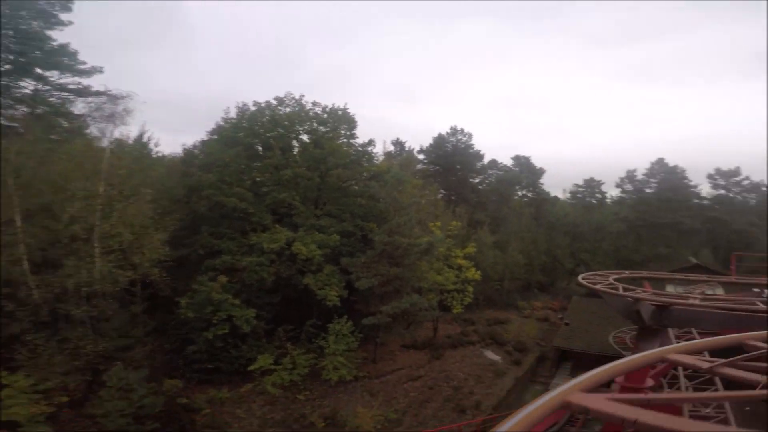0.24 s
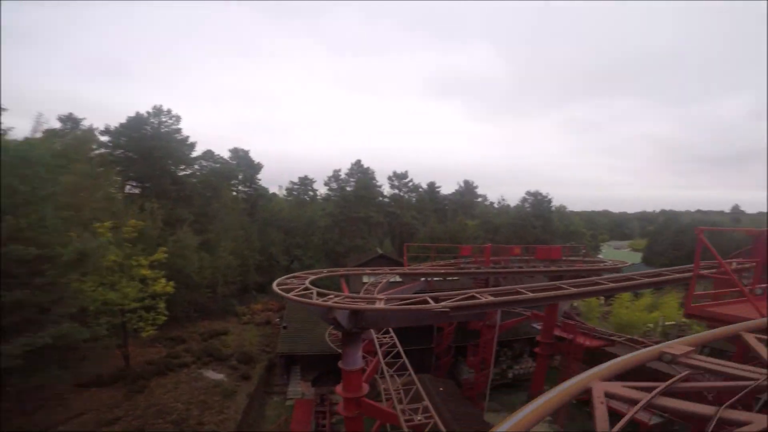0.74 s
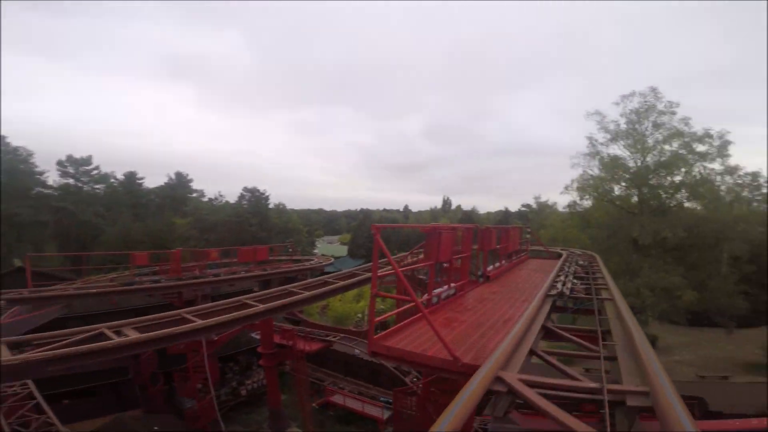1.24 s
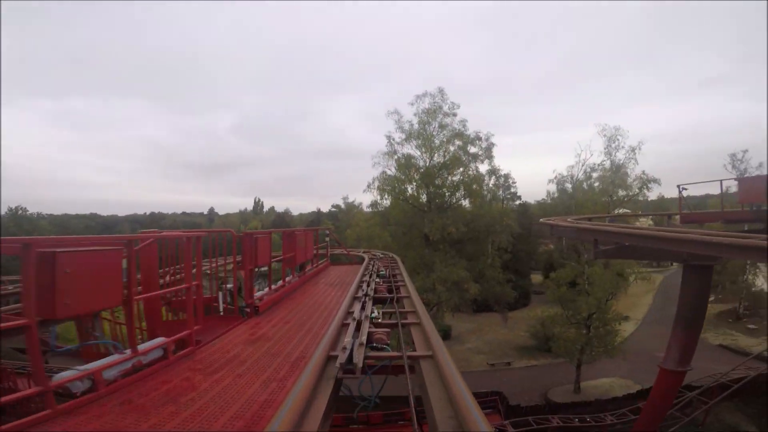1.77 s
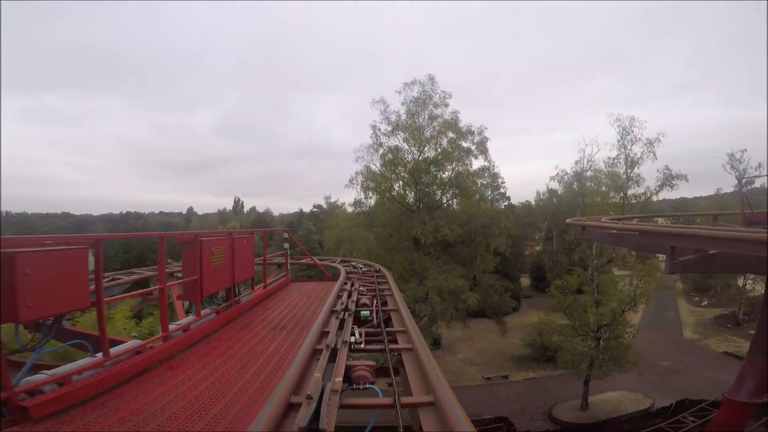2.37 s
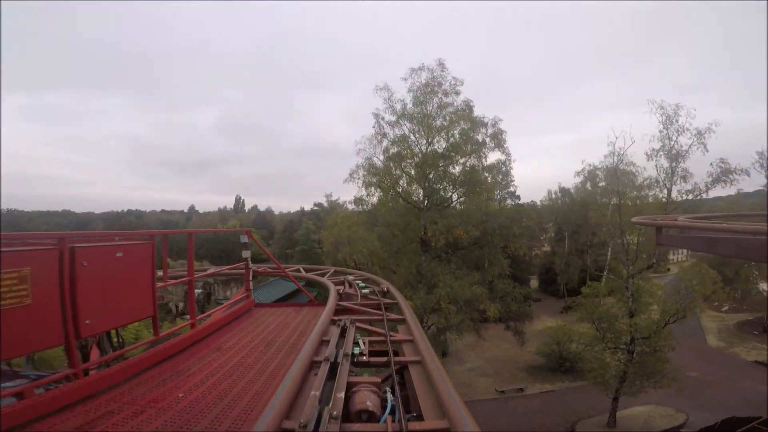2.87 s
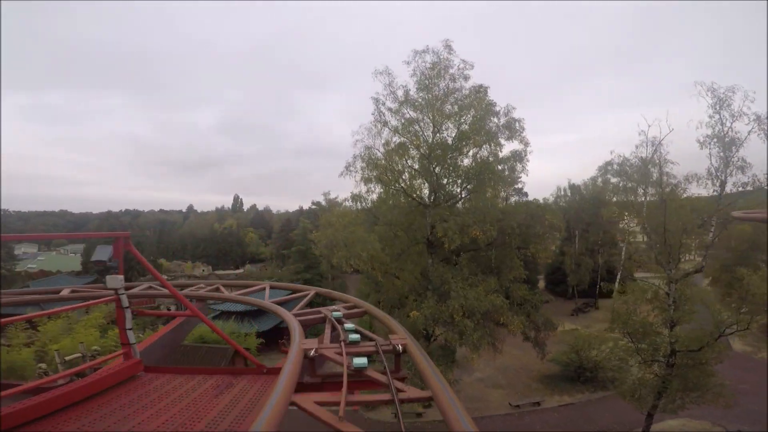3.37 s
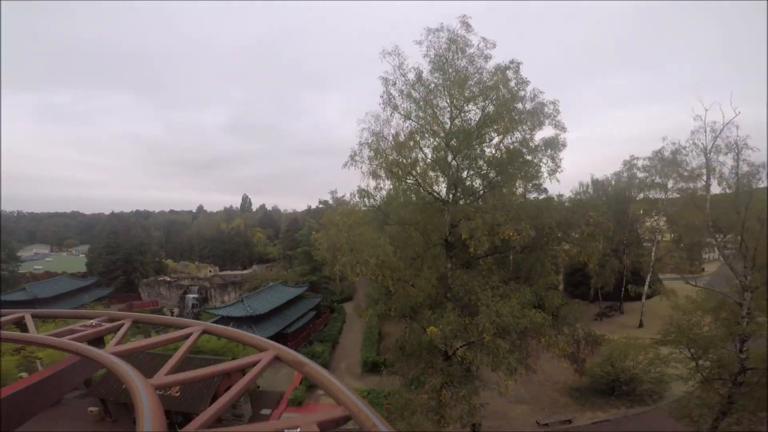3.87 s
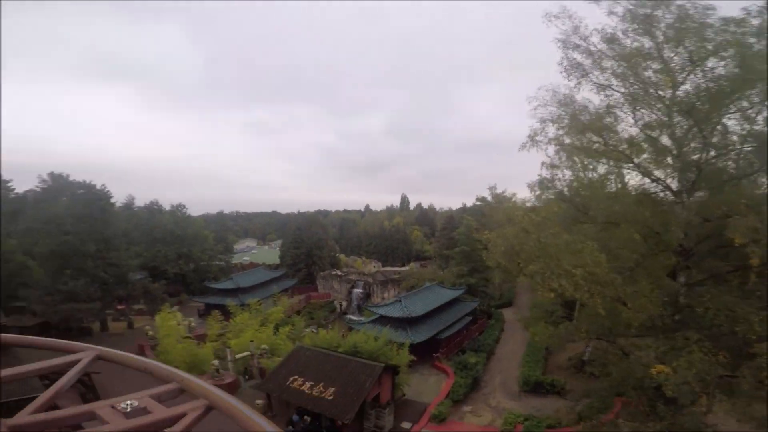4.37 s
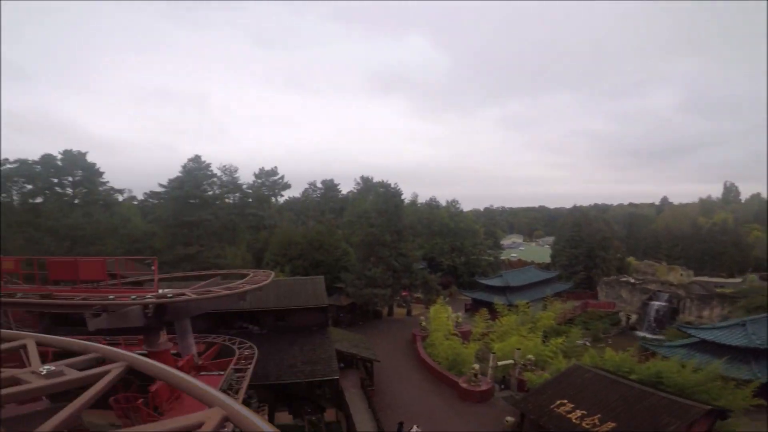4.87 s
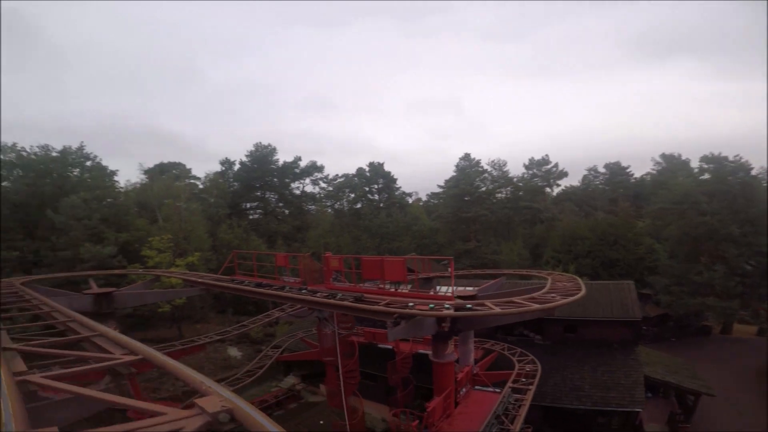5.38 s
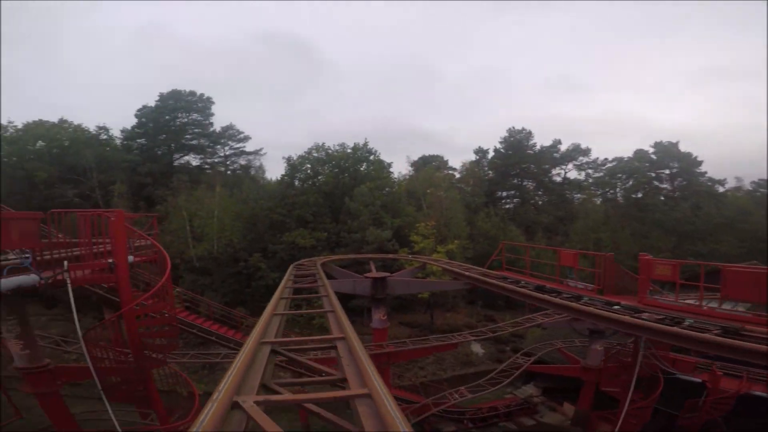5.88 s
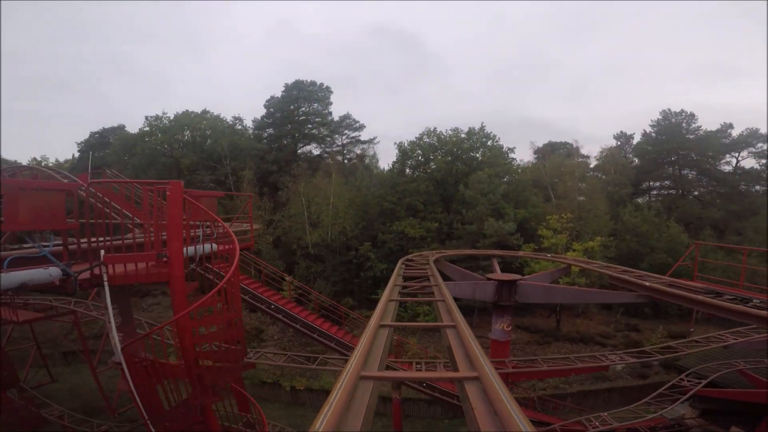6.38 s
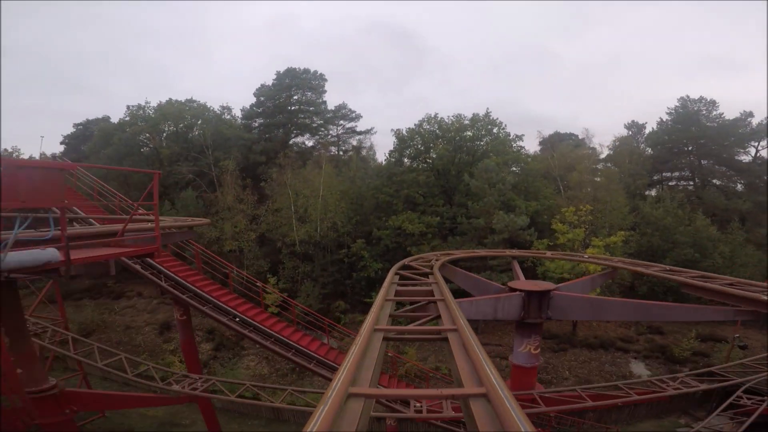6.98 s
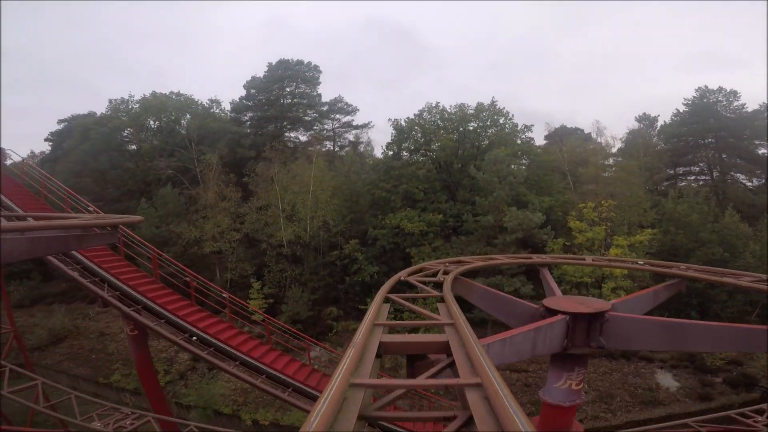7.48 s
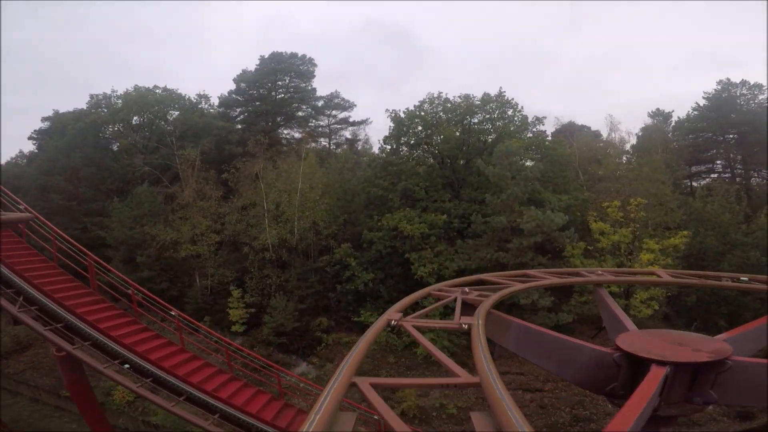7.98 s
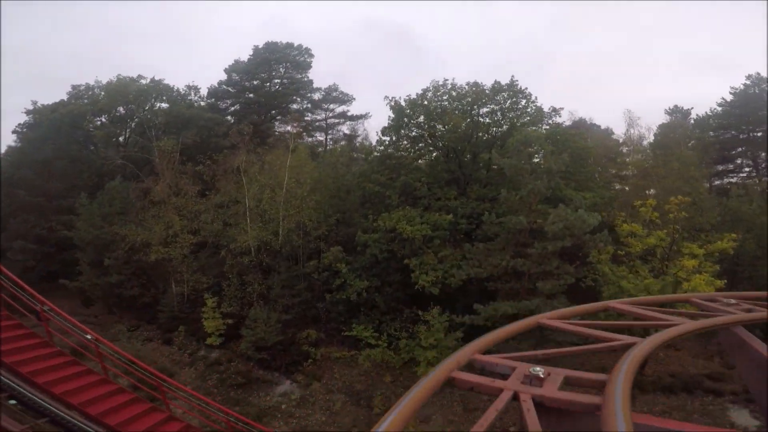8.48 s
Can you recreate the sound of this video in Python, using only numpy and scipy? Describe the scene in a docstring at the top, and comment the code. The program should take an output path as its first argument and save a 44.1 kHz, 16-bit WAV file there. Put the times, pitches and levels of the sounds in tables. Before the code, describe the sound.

Heavy low coaster rumble felt through the car, with dull knocks, a cluster of creaky metal groans, and a brief piercing wheel squeal at the end.

```python
"""Steel roller coaster, on board

Two bends and a level brake section, heard at no distance by a camera's two microphone ports, fixed to the car.
Shaken resonances make the heave, boom and drone; shaped noise makes the roar, hiss, grinding and scrapes.
Short damped rings and noise bursts make the coupling knocks, and noise bursts the judders.
Gliding sines make the wheel hum, frame groans and squeals, with one strong squeal in the last bend.
"""
import sys
import numpy as np
from scipy import signal
from scipy.fft import rfft, irfft, next_fast_len
from scipy.io import wavfile
from scipy.ndimage import uniform_filter1d, minimum_filter1d

SR = 44100
rng = np.random.default_rng(int(sys.argv[2]) if len(sys.argv) > 2 else 0)


def master_out(mix):
    """Clip the mix to full scale and print it as 16-bit PCM to the path in sys.argv[1]."""
    frames = np.transpose(np.atleast_2d(mix))
    ceiling = np.clip(frames, -1, 1)
    pcm = np.round(ceiling * 32767).astype(np.int16)
    wavfile.write(sys.argv[1], SR, pcm)


N = 384993
T = np.arange(N) / SR  # seconds
FREQ = np.maximum(np.arange(N // 2 + 1) * SR / N, 1)  # Hz

# How the mount passes vibration to the left port against the right.
# Each row: frequency in Hz, left level in dB, left lead in radians.
MOUNT = [(38.4, -17, 4.5), (96, -12, -1), (179, -23.5, 1), (324, -13, 3.5), (513, -5.5, 4), (690, -4, 3.5),
         (1170, -3, 3.5), (2320, -0.5, 0.76), (3840, -1.5, 1), (7440, -2.5, -2.5), (10800, -10.5, -1.5)]

# Resonances of the car: its heave on the wheels, its chassis, the upper chassis mode and its frame.
# Each row: frequency in Hz, width in Hz, relative level in dB.
HEAVE_MODES = [(27.8, 35, -10.5), (39.3, 27, 6), (79.65, 9.6, 1)]
CHASSIS_MODES = [(123.3, 52, -0.083), (147.2, 48, -0.074)]
UPPER_MODE = [(178.14, 28, 0)]
FRAME_MODES = [(232, 34, -1.5), (269.6, 45.3, 1), (364, 20, -15.5)]
# Course of the ride's rumble. Each row: time in seconds, heave, chassis boom and frame drone in dB before trims.
RIDE = [(0, -18.5, -15.5, -41), (.55, -22.5, -20.5, -40.5), (1.05, -26.5, -17, -36.5),
        (1.8, -21.5, -20, -38), (2.4, -27, -25.5, -40), (3.6, -24.5, -22.5, -28), (4.25, -23, -19.5, -32.5),
        (4.7, -20, -26, -36.5), (5.9, -20.5, -19.5, -30), (6.8, -24, -23, -41), (7.8, -22, -19, -33.5),
        (8.73, -18.5, -21, -33.5)]
# Separate swells of the upper chassis mode. Each row: time in seconds, level in dB before trim.
UPPER_BOOM = [(0.0, -29.5), (0.51, -37), (0.82, -23), (1.55, -36), (2.82, -33.5), (3.62, -30.5),
              (5.76, -28.5), (5.98, -25), (6.25, -38.5), (8.41, -31), (8.44, -36.5)]

# Hum of the wheels on the rails. Each row: time in seconds, centre pitch in Hz, mean level in dB.
WHEEL_HUM = [(0, 118.5, -41), (1.5, 117.9, -29.5), (2.55, 122, -27.5), (2.75, 124.2, -21.5),
             (2.92, 121.6, -29), (3.12, 122.1, -20), (3.27, 122, -24.5), (3.88, 119, -22),
             (4.13, 123.4, -19.5), (4.25, 125.8, -29.5), (6.1, 122.6, -31), (6.6, 129.3, -24.5),
             (8.3, 140.6, -26.5), (8.73, 120.3, -20)]

# Spectra of the rolling wheels, low roar and fine hiss. Each row: frequency in Hz, relative density in dB per Hz.
ROAR_SPECTRUM = [(150, -12), (300, 12), (450, 2), (650, -5.5), (1000, -13), (1500, -19), (2200, -30.5),
                 (4000, -30.5), (9000, -52.5)]
HISS_SPECTRUM = [(500, -8.5), (1100, 1.5), (1900, -3.5), (2650, -0.5), (3400, -10), (4700, -11.5),
                 (6000, -4), (7300, 3), (8400, -3.5), (10000, -9.5), (11500, -23.5), (15000, -55.5)]
# Course of the rolling noise. Each row: time in seconds, roar and hiss in dB before trims.
ROLL = [(0, -59, -65.5), (.3, -64, -76), (1.2, -62.5, -75), (1.6, -61.5, -73.5), (2.45, -61.5, -70.5),
        (2.9, -60.5, -69.5), (3.7, -55.5, -69.5), (4.15, -58, -77), (4.6, -65.5, -78), (5.3, -61, -71.5),
        (5.9, -60, -75.5), (6.7, -61, -76.5), (7.3, -55.5, -66), (8.25, -53.5, -61.5), (8.73, -58, -69)]

# Side wheels grinding before the last bend. Each row: time in seconds, level in dB.
GRIND = [(6.1, -101), (6.4, -59.5), (7.0, -57), (7.5, -77), (8, -97)]
# Resonance of the grinding. Each row: frequency in Hz, width in Hz, relative level in dB.
GRIND_MODE = [(970, 610, 0)]

# Faint wheel squeals. Each row: start in seconds, length in seconds, centre pitch in Hz, level in dB.
SQUEALS = [(0.774, 0.23, 2590, -71), (2.1, 2.0, 3870, -71), (4.243, 0.027, 3920, -62),
           (4.76, 0.46, 3190, -75), (5.19, 0.13, 2990, -66.5), (6.014, 0.04, 3770, -61)]

# Dry scrapes of a side wheel. Each row: peak time in seconds, level in dB.
SCRAPES = [(4.149, -45.5), (6.009, -53)]
# Resonance of the scrapes. Each row: frequency in Hz, width in Hz, relative level in dB.
SCRAPE_MODE = [(1650, 1160, 0)]

# Frame groans in the brake section. Each row: start in seconds, length in seconds, centre pitch in Hz, level in dB.
GROANS = [(2.648, 0.12, 227.2, -15.5), (2.729, 0.072, 270, -20.5), (2.855, 0.073, 290.4, -23),
          (2.965, .055, 355, -25), (3.01, 0.072, 282, -18.5), (3.252, 0.15, 227.6, -21),
          (3.403, 0.097, 229.3, -19.5), (3.413, .055, 358, -22.5), (3.443, 0.065, 273.6, -24.5),
          (3.534, 0.082, 226, -17.5), (3.583, 0.082, 258.4, -15), (3.669, 0.084, 348.6, -22.5),
          (3.707, 0.084, 276.5, -22), (3.795, 0.068, 310.7, -22), (3.836, .14, 223.6, -21)]

# Judders as wheels and brake fin scrub. Each row: peak time in seconds, scrub in dB before trims, crackle in dB.
JUDDERS = [(1.665, -36, -73), (1.704, -30, -53), (2.661, -33, -75.5), (2.705, -25, -51),
           (2.831, -20, -49.5), (2.993, -23.5, -57.5), (3.1, -32, -77), (3.436, -27.5, -58),
           (3.592, -20.5, -46), (3.702, -31, -71), (3.825, -28.5, -59), (4.051, -34.5, -68),
           (6.008, -31, -50.5), (6.044, -38, -61), (6.165, -29.5, -60)]
# Spectrum of scrubbing and scuffing. Each row: frequency in Hz, relative density in dB per Hz.
SCRUB_SPECTRUM = [(120, -16), (240, 3), (360, 8), (425, -1), (500, 3), (565, 1), (635, -2), (950, -8),
                  (1400, -21), (2700, -36), (5000, -51.5), (8500, -42.5), (12000, -75)]
# Loose panels that clatter in a judder. Each row: frequency in Hz, width in Hz, relative level in dB.
CLATTER_MODES = [(365, 48, 1.5), (474, 94, -4), (603, 25, 3), (782, 140, -13)]

# Coupling knocks. Each row: time in seconds, clunk and tick in dB before trims, lower and upper pin in dB.
KNOCKS = [(1.446, -29, -58.5, -54, -47.5), (1.463, -28.5, -58.5, -43, -55),
          (1.483, -28.5, -58.5, -48.5, -57.5), (1.575, -28.5, -61, -60, -52),
          (1.59, -37.5, -57.5, -50, -61), (1.647, -27.5, -60, -54, -50.5), (1.759, -33.5, -70, -63.5, -67),
          (1.789, -29.5, -64, -61.5, -57.5), (1.863, -27, -59.5, -49, -50.5),
          (2.192, -26.5, -60, -45.5, -45.5), (2.276, -28, -71, -56, -60), (3.318, -22, -65, -46.5, -46.5),
          (3.863, -24, -57.5, -43, -49.5), (3.894, -29, -66.5, -55, -58), (3.915, -25, -59.5, -52.5, -49),
          (5.665, -38, -66, -60, -55), (5.701, -30.5, -54.5, -51.5, -55), (5.703, -31.5, -58, -56, -55),
          (5.713, -30, -67, -49.5, -50), (5.778, -26.5, -66, -45.5, -65), (5.831, -34.5, -72, -49.5, -72.5),
          (6.066, -23.5, -51, -42.5, -62), (6.09, -25.5, -59.5, -47.5, -60), (6.152, -25, -56, -57, -64),
          (8.419, -24, -56, -42.5, -53), (8.478, -23.5, -55, -51, -41), (8.665, -30, -52.5, -40, -49)]
# Dull ring of a knock. Each row: centre frequency in Hz, relative level in dB, 60 dB decay in seconds.
KNOCK_BODY = [(258, -3, 0.11), (390, 4.5, 0.018), (748, 3, 0.011), (1310, -9, 0.018)]
# Ring of the two steel pins. Each row: centre frequency in Hz, 60 dB decay in seconds.
PIN_MODES = [(2750, 0.0071), (4390, 0.0092)]
# Spectrum of steel on steel. Each row: frequency in Hz, relative density in dB per Hz.
STEEL_SPECTRUM = [(700, -15.5), (1450, 10), (2100, 3), (2900, -1), (3600, -5), (5500, -5), (7800, 2),
                  (9800, -4.5), (11500, -23.5), (15000, -38)]

# Squeal of one wheel in the last bend. Each row: time in seconds, centre pitch in Hz, mean level in dB.
BEND_SQUEAL = [(8.515, 3500, -71), (8.535, 3520, -47), (8.558, 3610, -60), (8.595, 3330, -49.5),
               (8.614, 3534, -39.5), (8.645, 3484, -44.5), (8.672, 3560, -48), (8.688, 3470, -60),
               (8.703, 3530, -60), (8.73, 3500, -68)]

OCTAVE_MATCH_DB = -33.5  # level at which a squeal's octave equals it
OCTAVE_GROWTH = 0.26  # dB that the octave falls behind per dB below that level
OCTAVE_LIMIT_HZ = 4200  # higher squeals are pure tones
TOP_HZ = 15600  # top edge of the microphone channel


def undb(db):
    """Decibels to gain."""
    return 10 ** (np.asarray(db) / 20)


def unit(x):
    """Scale to rms 1."""
    return x / np.sqrt(np.mean(x ** 2))


def curves(table):
    """The columns of a time table, sample by sample."""
    time, *columns = np.transpose(table)
    return [np.interp(T, time, c) for c in columns]


def spectra(table):
    """The columns of a frequency table, bin by bin on a log scale."""
    hz, *columns = np.transpose(table)
    return [np.interp(np.log(FREQ), np.log(hz), c) for c in columns]


def spectrum(table):
    """Frequency response with the densities of a spectrum table."""
    return undb(spectra(table)[0])


def filtered(x, response):
    """Pass a sound through a frequency response."""
    return irfft(rfft(x) * response, N)


def noise():
    """White noise."""
    return rng.standard_normal(N)


def walk(rate):
    """Smooth chance of rms 1 that changes about rate times a second."""
    return unit(filtered(noise(), np.exp(-(FREQ / rate) ** 2)))


def resonances(modes):
    """Response of steep band-passes side by side, added in power."""
    power = 0
    for hz, width, db in modes:
        detuning = (FREQ - hz * hz / FREQ) / width
        power = power + undb(2 * db) / (1 + detuning ** 2) ** 2.43
    return np.sqrt(power)


def ports(near, stray=0.0, share=0.0):
    """Left and right ports: the right is shaken hardest; the left also picks up a share of unrelated vibration."""
    left_db, lead = spectra(MOUNT)
    left = np.sqrt(1 - share) * near + np.sqrt(share) * stray
    return np.array([filtered(left, undb(left_db) * np.exp(1j * lead)), near])


def shaken(response, share, force=1.0):
    """Rail roughness, scaled by a force, drives a response at both ports."""
    response = response / np.sqrt(np.mean(response ** 2))
    near = filtered(force * noise(), response)
    stray = filtered(force * noise(), response)
    return ports(near, stray, share)


def add(track, start, sound):
    """Mix a sound in at a time in seconds."""
    i = max(int(start * SR), 0)
    track[i:i + len(sound)] += sound[:N - i]


def bursts(rows, rise_s, fall_s):
    """A force that swells up to each (time, dB) and dies away."""
    force = np.zeros(N)
    age = np.arange(-SR // 20, SR // 4) / SR
    for time, db in rows:
        add(force, time + age[0], undb(db) * np.exp(np.minimum(age / rise_s, -age / fall_s)))
    return force


def ring(modes, age, detune):
    """Damped modes after one blow, peak 1; neighbours swing in opposite directions."""
    y = np.zeros(len(age))
    for k, (hz, db, t60) in enumerate(modes):
        decay = undb(db - 60 * age / t60)
        y += (-1) ** k * decay * np.sin(2 * np.pi * hz * detune[k] * age)
    return y / np.abs(y).max()


def sing(hz, db):
    """A slipping wheel sings on one mode; the louder it sings, the stronger its octave."""
    phase = 2 * np.pi * np.cumsum(hz) / SR
    octave = undb(OCTAVE_GROWTH * (db - OCTAVE_MATCH_DB)) * (hz.mean() < OCTAVE_LIMIT_HZ)
    return undb(db) * (np.sin(phase) + octave * np.sin(2 * phase))


def rumble(heave_db, boom_db, drone_db):
    """Rail roughness makes the car heave on its wheels, its chassis boom and its frame drone."""
    heave = shaken(resonances(HEAVE_MODES), share=0.41) * undb(heave_db)
    boom = shaken(resonances(CHASSIS_MODES), share=0.13) * undb(boom_db - 0.6)
    upper = shaken(resonances(UPPER_MODE), share=0.29) * undb(curves(UPPER_BOOM)[0] + 4.5)
    drone = shaken(resonances(FRAME_MODES), share=0.92) * undb(drone_db)
    return heave + boom + upper + drone


def hum(wander=0.03, flutter_db=3):
    """The wheels hum on the rails as one sine, unsteady in pitch and level."""
    hz, db = curves(WHEEL_HUM)
    phase = 2 * np.pi * np.cumsum(hz * (1 + wander * walk(20.3))) / SR
    return ports(unit(np.sin(phase)) * undb(db + flutter_db * walk(35)))


def wheels(roar_db, hiss_db):
    """Rolling noise: a gritty roar through the frame and a fine hiss through the air."""
    roar_force = undb(roar_db + 16.5 + 2.0 * walk(35))
    hiss_force = undb(hiss_db + 9.0 + 1.5 * walk(38))
    roar = shaken(spectrum(ROAR_SPECTRUM), share=0.99, force=roar_force)
    hiss = shaken(spectrum(HISS_SPECTRUM), share=0.9, force=hiss_force)
    return roar + hiss


def grinding():
    """The side wheels grind: rough noise through one broad resonance."""
    force = undb(curves(GRIND)[0] + 2 * walk(50))
    return shaken(resonances(GRIND_MODE), share=1.0, force=force)


def squeals(flutter_db=3.5, scatter=0.016, wander=0.003):
    """Wheels that only just slip sideways sing faintly, with a rough, fluttering tone."""
    out = np.zeros(N)
    flutter = unit(undb(flutter_db * walk(30)))
    bend = 1 + scatter * walk(390) + wander * walk(23)
    for start, length, hz, db in SQUEALS:
        on = (T > start) & (T < start + length)
        swell = np.sqrt(np.abs(np.sin(np.pi * (T[on] - start) / length)))
        out[on] += swell * flutter[on] * sing(hz * bend[on], db)
    return ports(out)


def scrapes(grit_db=3):
    """A side wheel grazes the rail with a short, dry rasp."""
    grit = unit(undb(grit_db * walk(300)))
    force = bursts(SCRAPES, rise_s=0.005, fall_s=0.01) * grit
    return shaken(resonances(SCRAPE_MODE), share=0.66, force=force)


def groans(waver=0.025, overtone=2.3, overtone_db=-17):
    """Each snatch of the brake sets a frame mode groaning; it wavers as the frame flexes, with a faint overtone."""
    out = np.zeros(N)
    flex = 1 + waver * walk(62)
    for start, length, hz, db in GROANS:
        on = (T > start) & (T < start + length)
        phase = 2 * np.pi * np.cumsum(hz * flex[on]) / SR
        swell = np.sin(np.pi * (T[on] - start) / length)
        tone = np.sin(phase) + undb(overtone_db) * np.sin(overtone * phase)
        out[on] += undb(db) * swell * tone
    return ports(out)


def judders(grit_db=3, rub_db=-4, clatter_db=-6):
    """Each scrub is a burst of small slips with a shorter crackle; loose panels clatter with it."""
    times, scrub_db, crackle_db = np.transpose(JUDDERS)
    slips = unit(undb(grit_db * walk(230)))
    rub = bursts(zip(times, scrub_db), rise_s=0.0067, fall_s=0.032) * slips
    bite = bursts(zip(times, crackle_db), rise_s=0.006, fall_s=0.018)
    scrub = undb(rub_db) * shaken(spectrum(SCRUB_SPECTRUM), share=1.0, force=rub)
    clatter = undb(clatter_db) * shaken(resonances(CLATTER_MODES), share=0.23, force=rub)
    crackle = shaken(spectrum(STEEL_SPECTRUM), share=0.31, force=bite)
    return scrub + clatter + crackle


def knocks(body_db=12.0, tick_db=15, scuff_db=-10, scatter=0.08, pin_scatter=0.025, contact_s=0.0019):
    """Coupling parts scuff as the slack closes, then meet: a dull clunk, a tick of steel, two ringing pins."""
    struck = np.zeros(N)
    age = np.arange(SR // 20) / SR
    chances = rng.standard_normal((len(KNOCKS), len(KNOCK_BODY)))  # each blow is tuned a little differently
    for (time, db, _, *pins_db), chance in zip(KNOCKS, chances):
        add(struck, time + 0.001, undb(db + body_db) * ring(KNOCK_BODY, age, 1 + scatter * chance))
        for (hz, t60), pin_db in zip(PIN_MODES, pins_db):
            pin = ring([(hz, 0, t60)], age, 1 + pin_scatter * chance)
            add(struck, time + contact_s, undb(pin_db) * pin)
    times, clunk_db, steel_db, *_ = np.transpose(KNOCKS)
    contact = bursts(zip(times + contact_s, steel_db + tick_db), rise_s=0.00076, fall_s=0.0014)
    rub = bursts(zip(times, clunk_db + scuff_db), rise_s=0.006, fall_s=0.008)
    tick = shaken(spectrum(STEEL_SPECTRUM), share=0.93, force=contact)
    scuff = shaken(spectrum(SCRUB_SPECTRUM), share=1.0, force=rub)
    return ports(struck) + tick + scuff


def bend_squeal(scatter=0.004, flutter_db=1):
    """In the last bend one wheel catches, swells to a full squeal and lets go, wobbling in pitch."""
    hz, db = curves(BEND_SQUEAL)
    tone = sing(hz * (1 + scatter * walk(250)), db + flutter_db * walk(120))
    return ports(tone * (T > BEND_SQUEAL[0][0]))


def scene():
    """Everything that shakes the car, at both microphone ports."""
    background = rumble(*curves(RIDE)) + hum() + wheels(*curves(ROLL)) + grinding()
    events = squeals() + scrapes() + groans() + judders() + knocks() + bend_squeal()
    return background + events


def limited(x, ceiling_db, window_s):
    """A limiter turns both ports down around each swell that passes its ceiling at the right, louder port."""
    size = max(int(window_s * SR), 2)
    swing = np.abs(signal.hilbert(x[1], next_fast_len(N)))[:N]
    gain = np.minimum(1, undb(ceiling_db) / (swing + 1e-9))
    held = minimum_filter1d(gain, size)
    return x * uniform_filter1d(uniform_filter1d(held, size), size)


def record(dry):
    """The camera lifts the bass slightly, holds it under a ceiling and cuts the top."""
    bass = filtered(dry, 1 / (1 + (FREQ / 330) ** 4))
    held = dry - bass + limited(bass * undb(2.0), ceiling_db=-9.0, window_s=0.0042)
    top_cut = signal.ellip(8, 0.2, 70, TOP_HZ, fs=SR, output="sos")  # 0.2 dB ripple, 70 dB rejection
    return signal.sosfilt(top_cut, held)


dry = scene()
out = record(dry)
master_out(out)
```